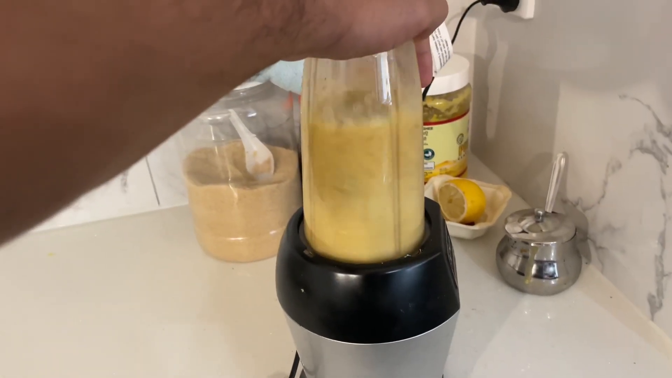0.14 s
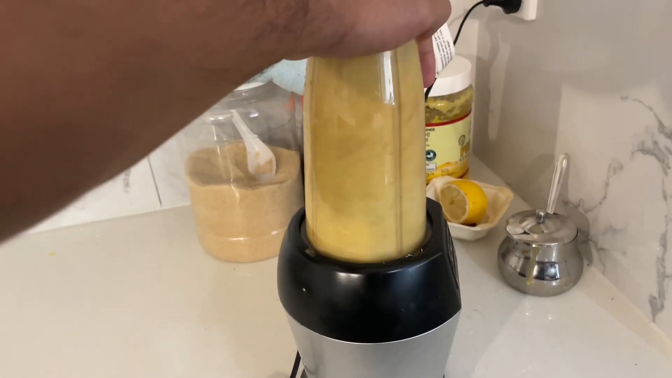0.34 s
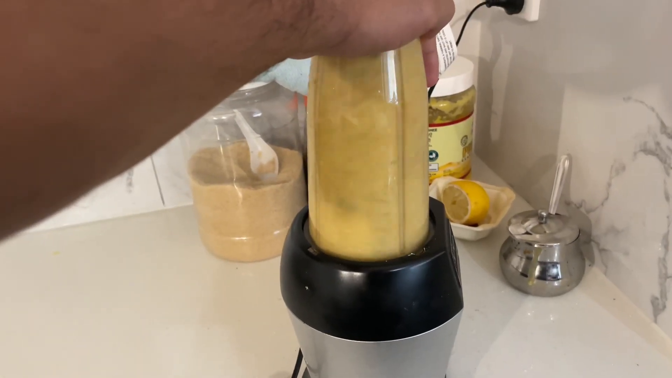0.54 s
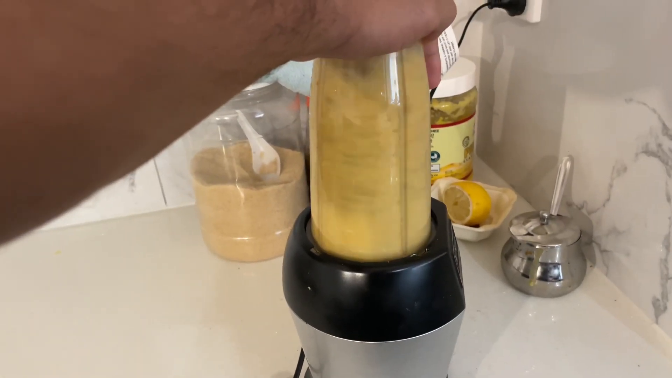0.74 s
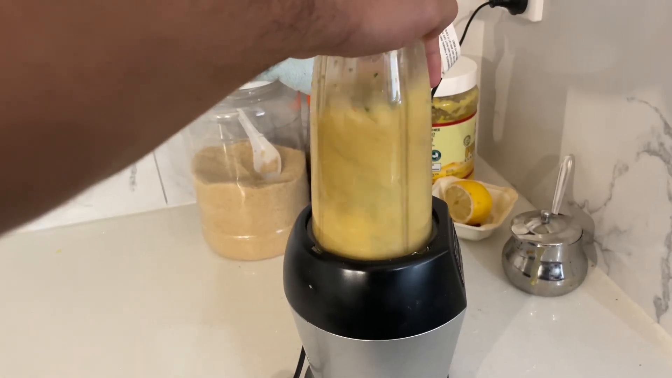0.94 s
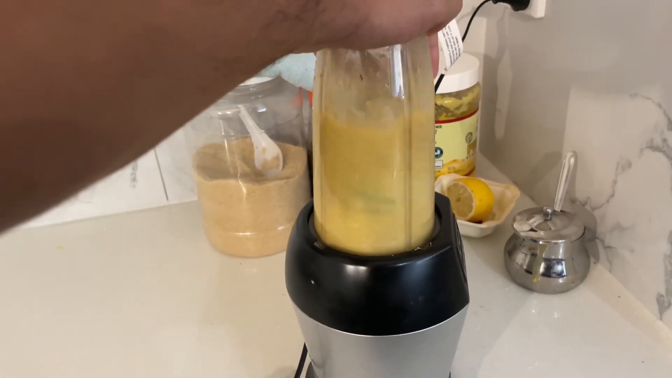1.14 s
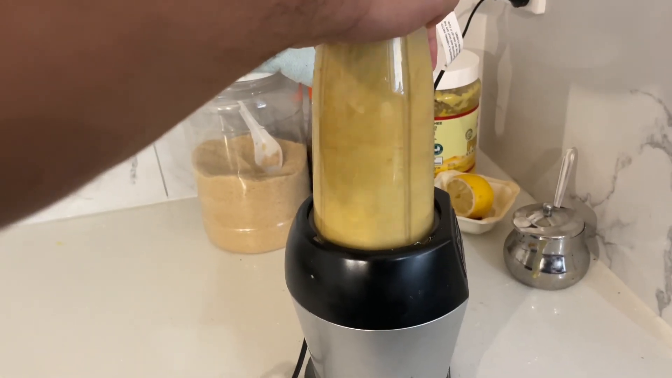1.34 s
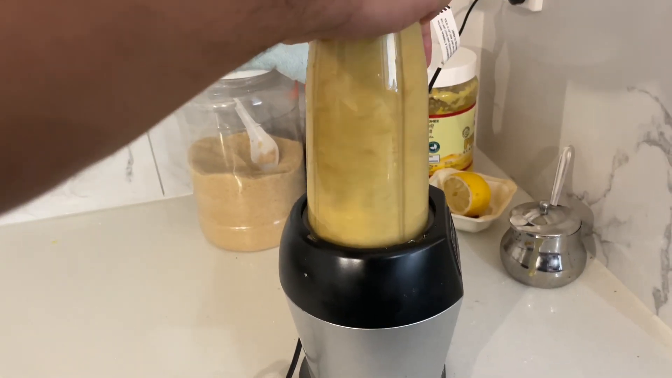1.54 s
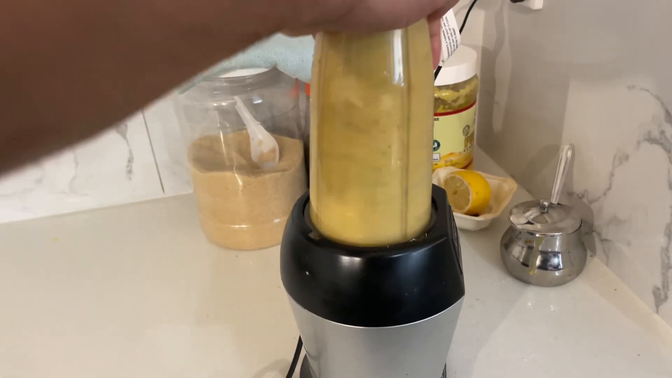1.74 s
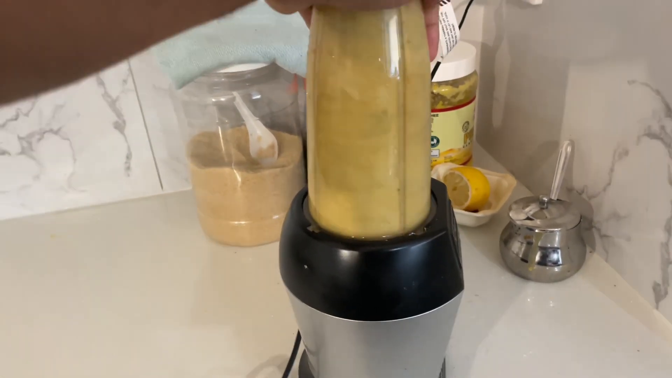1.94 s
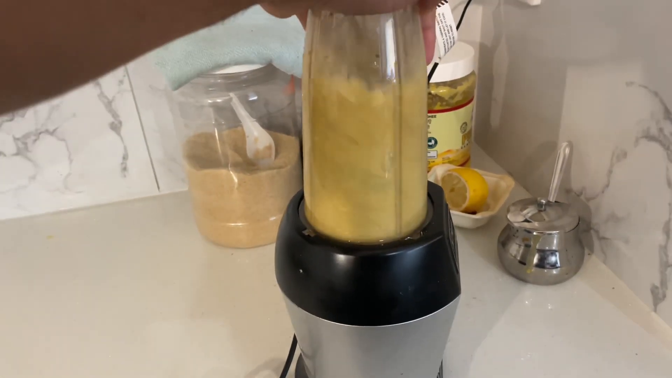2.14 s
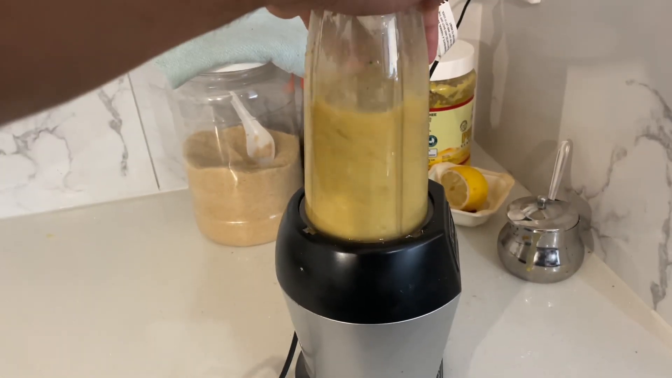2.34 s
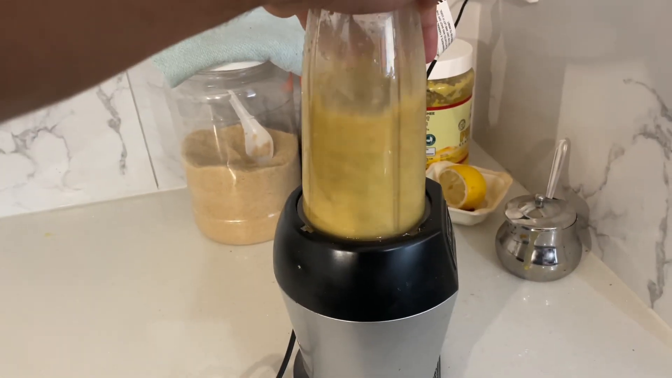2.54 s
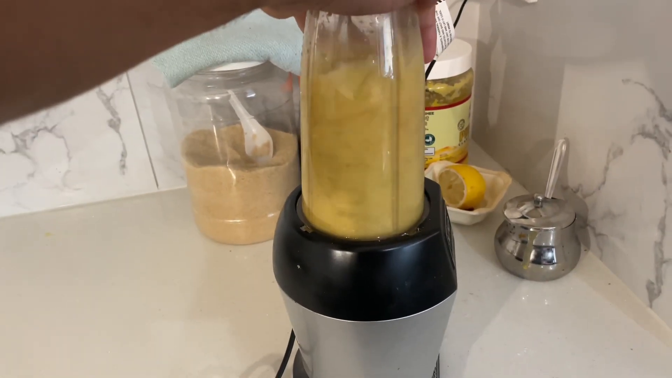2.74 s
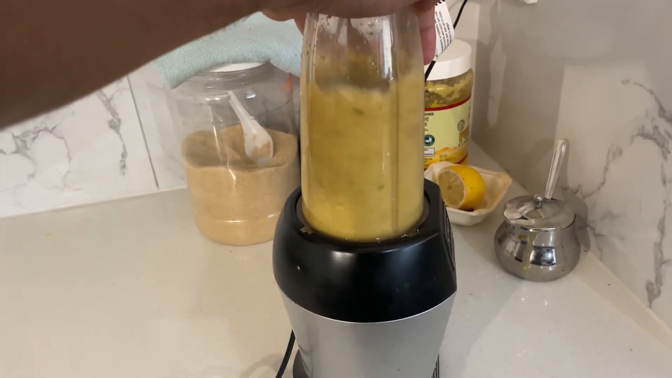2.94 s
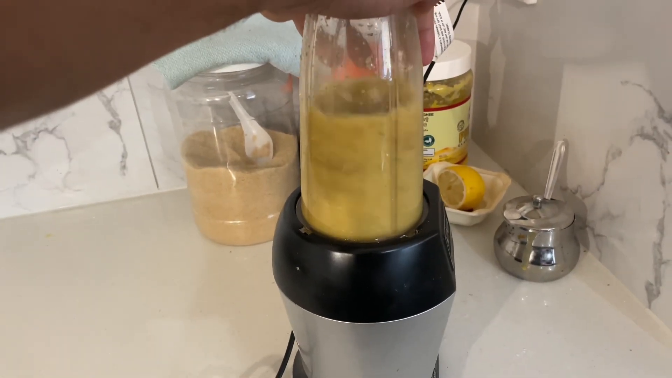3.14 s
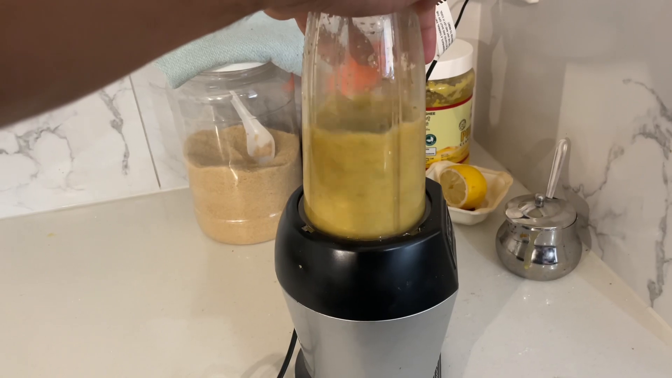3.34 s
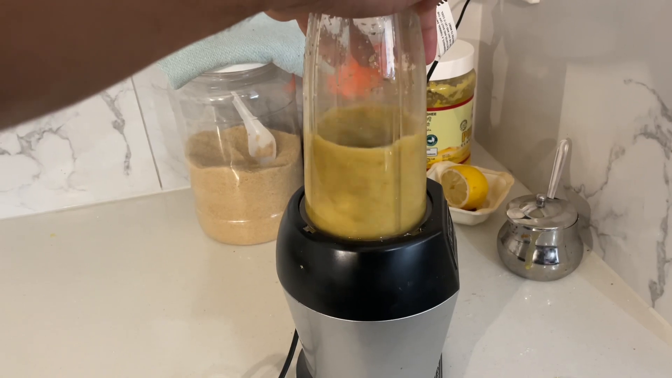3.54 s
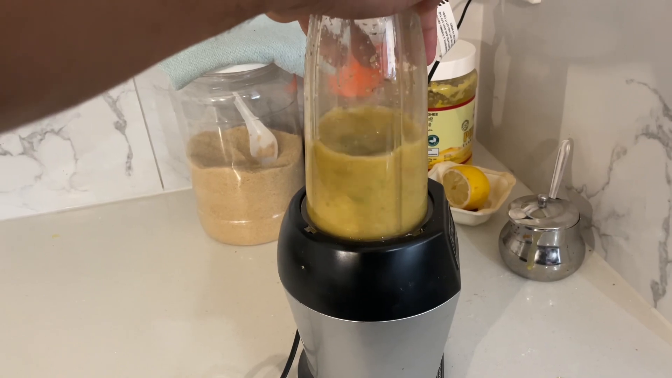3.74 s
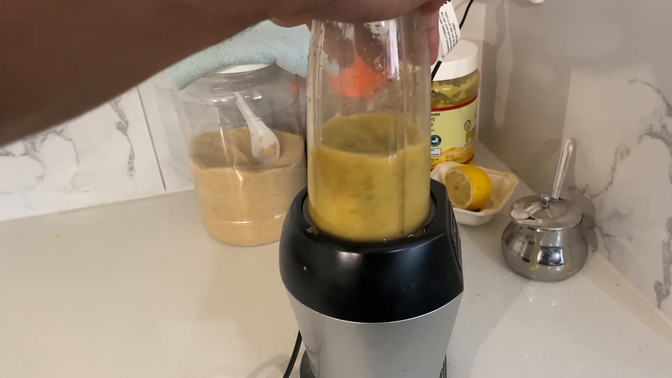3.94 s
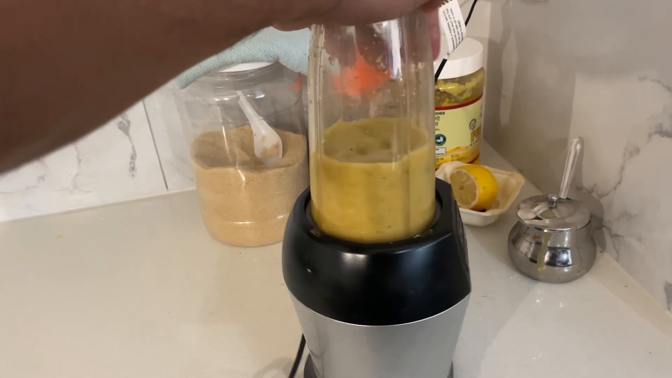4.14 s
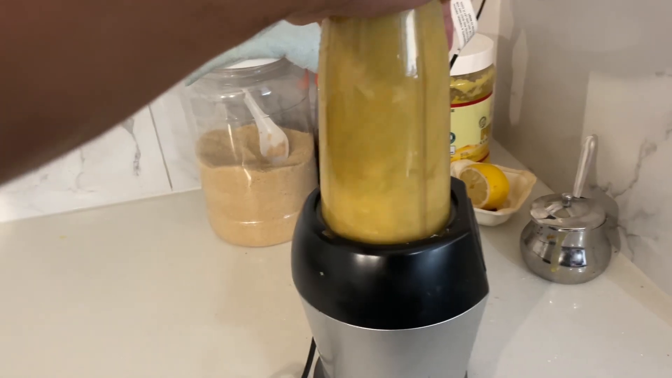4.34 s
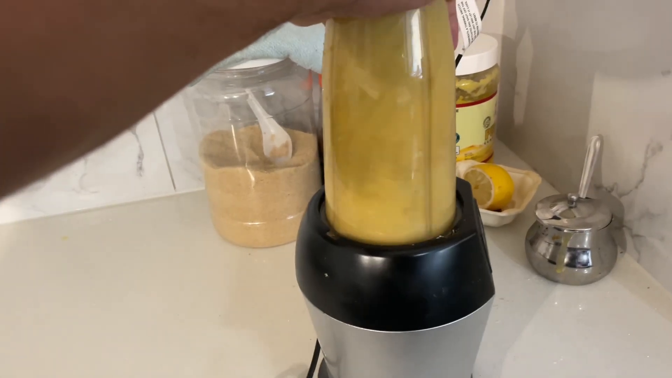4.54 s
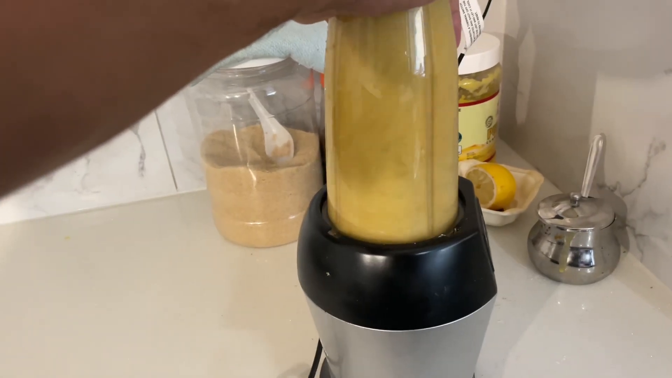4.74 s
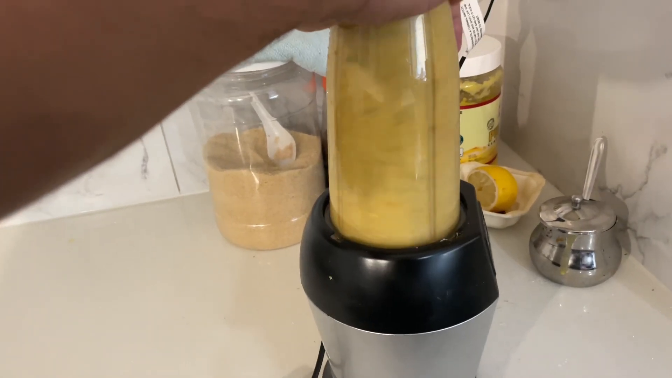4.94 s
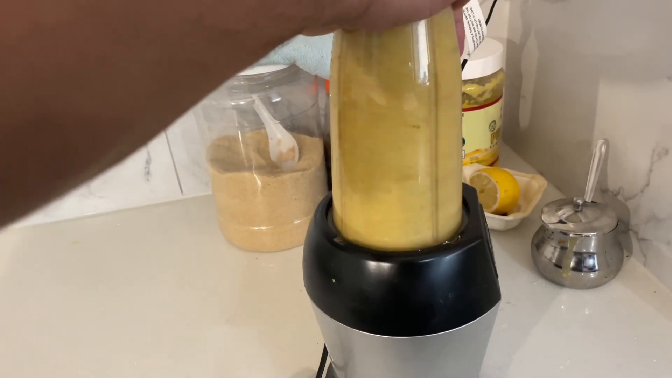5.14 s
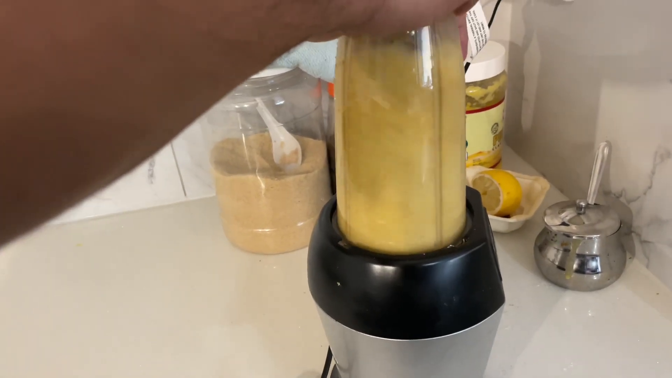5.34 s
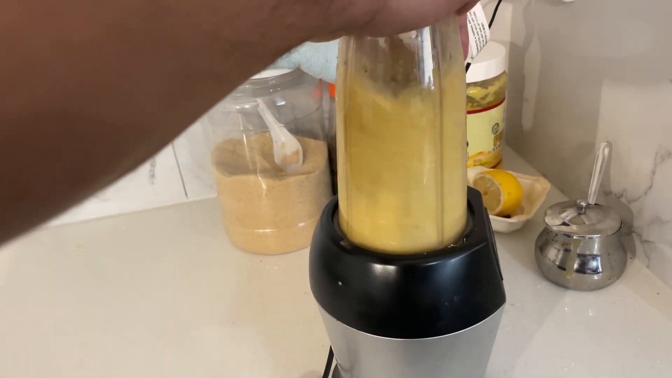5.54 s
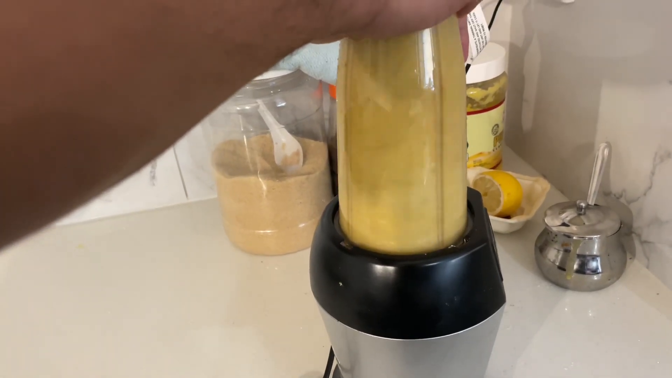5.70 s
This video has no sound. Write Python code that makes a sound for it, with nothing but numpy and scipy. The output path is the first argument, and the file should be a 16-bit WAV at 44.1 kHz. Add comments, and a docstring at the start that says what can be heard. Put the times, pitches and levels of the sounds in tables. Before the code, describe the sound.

A small blender runs on a kitchen counter, very close, in stereo with little room echo. It begins already at speed: a buzzy motor whine around 285 hertz with higher harmonics, over broad, raspy liquid churning and hiss. At about 0.4 s power drops and the pitch sags, softening until 0.8 s, when the motor catches and climbs back to full speed by about 1.3 s. From 1.8 s it winds down in a long falling glide, the churning thinning out. Between 2.3 and 3.2 s loose plastic coupling knocks and ticks rattle irregularly as the shaft slows, with one last faint click near 3.5 s. Then near silence, just low room noise and faint hum. Around 4.1 s a short scrape and a loud, hard switch clack lead into a rapid rising spin-up. From about 4.6 s the full whine and dense, slightly fluctuating churn continue, ending abruptly at nearly 5.9 s.

```python
"""A small blender on a kitchen counter churns a thick drink, close to a phone that hears in stereo.
The motor coasts, picks up at 0.8 s and winds down from 1.8 s with the coupling rattling, then rests.
Near 4.1 s the cup scrapes down, the switch clacks and the motor kicks in and churns to the end.
Shaft orders are sine sums, the churning is filtered noise and ticks, knocks and clack are short rings;
low room noise with a faint hum lies beneath."""
import sys
import numpy as np
from scipy import signal
from scipy.fft import rfft, irfft, next_fast_len
from scipy.io import wavfile
from scipy.ndimage import uniform_filter1d

SR = 44100
rng = np.random.default_rng(int(sys.argv[2]) if len(sys.argv) > 2 else 0)


def inscribe(sig):
    """Save sig as 16-bit PCM at rate SR to the path in sys.argv[1].

    A 1-D sig is mono; a 2-D sig holds one channel per row.
    Samples are clipped to [-1, 1] before scaling.
    """
    pcm = np.round(np.clip(np.atleast_2d(sig).T, -1, 1) * 32767)
    wavfile.write(sys.argv[1], SR, pcm.astype(np.int16))


N = 258867


def gain_of(db):
    """Amplitude factor of a level in dB."""
    return 10 ** (np.asarray(db) / 20)


def evened(x):
    """Scale to rms 1."""
    return x / np.sqrt(np.mean(abs(x) ** 2) + 1e-20)


def read(points, hz):
    """Interpolate a (frequency, value) table along log frequency."""
    f, value = np.transpose(points)
    return np.interp(np.log(hz + 1), np.log(f + 1), value)


def peaks_db(table, hz):
    """Resonance curves in dB, one per (centre, width, height) row."""
    return [db / (1 + (2 * (hz - f) / w) ** 2) for f, w, db in table]


def add(mix, s, sound):
    """Mix a sound in at a time in seconds."""
    part = mix[round(s * SR):][:len(sound)]
    part += sound[:len(part)]


def drift(count, size):
    """Smoothed noise of rms 1; size is the smoothing length in steps."""
    smooth = uniform_filter1d(rng.standard_normal(count), size)
    return evened(uniform_filter1d(smooth, size))


# Shaft, one table a spin: (time [s], speed [turns/s], order 1 rms [dB], order 4 before slack [dB])
SHAFT_SPINS = [
    [(0.0, 290, -22.5, -32), (0.05, 292.2, -25.5, -32), (0.36, 285, -22, -35), (0.42, 251.4, -36, -52),
     (0.68, 185.6, -37.5, -48), (0.812, 160.7, -43, -60), (0.85, 189, -39, -36), (0.9, 217, -35, -42),
     (0.95, 239, -36, -57), (1.04, 264.4, -31, -36), (1.23, 277.3, -27.5, -41), (1.27, 282.2, -24, -57),
     (1.3, 285.5, -25.5, -29), (1.39, 285.5, -23, -29), (1.43, 281.6, -24, -42), (1.54, 291.8, -25, -25.5),
     (1.62, 291.4, -24.5, -34), (1.76, 284.2, -22.5, -27), (1.85, 250.7, -34, -38), (1.96, 223.7, -34, -55),
     (2.02, 208.2, -37, -37.5), (2.27, 153, -43.5, -64), (2.44, 124.4, -45, -66), (2.54, 108, -57, -66),
     (2.64, 92, -60, -64), (2.69, 85, -47, -60), (2.93, 60.1, -50, -64), (3.08, 47, -58, -63),
     (3.22, 36, -68, -70)],
    [(4.2, 148.7, -45, -57), (4.228, 171.1, -35, -42), (4.27, 203, -42, -39), (4.29, 217, -36, -42),
     (4.34, 241, -28.5, -48), (4.4, 244.9, -31, -43), (4.492, 266.4, -34, -44), (4.552, 272.2, -22, -33),
     (4.594, 270.2, -34, -39), (4.72, 285.5, -20, -26.5), (4.766, 292.1, -20.5, -27.5),
     (4.854, 282, -22.5, -29), (4.948, 293.5, -23.5, -35), (5.022, 288.5, -29, -25),
     (5.068, 287.7, -23.5, -31), (5.138, 291.1, -21, -22), (5.2, 292.8, -38, -27),
     (5.324, 288.7, -22.5, -36), (5.442, 293.4, -33, -28), (5.572, 285, -25.5, -47),
     (5.608, 290.1, -23.5, -29), (5.692, 296, -32.5, -45), (5.79, 286.6, -26.5, -34),
     (5.856, 289.3, -23, -31), (5.87, 290, -28, -43)],
]
# Orders 2 and 3 at working speed: (multiple of shaft speed, level [dB])
MIDDLE_ORDERS = [(2, -36.5), (3, -33.5)]
# Weak orders: (multiple of shaft speed, level against half the summed orders 2-4 [dB])
WEAK_ORDERS = [(4 / 3, -8), (5, -9), (6, -13), (7, -11.5), (8, -13), (12, -10), (13, -14)]
WAVER_DB, WAVER_S = 2.0, 0.068  # orders 2 and 3 come and go
WORKING_HZ = 283.3  # shaft turns per second
SLACK_DB, SLACK_SPAN_HZ, SLACK_DB_PER_HZ = -8, 25, -0.0695  # upper orders below working speed
CRAWL_HZ, CRAWL_DB_PER_HZ = 150, -.35  # below this speed all but order 1 fade further
CUP_HZ, CUP_WIDTH_HZ, CUP_LEND_DB = 349, 26, 11  # cup's note, lifting an order that sweeps through


def shaft():
    """The spinning shaft: turns made so far, and sines at multiples of its speed."""
    turns, whine = np.zeros((2, N))
    for rows in SHAFT_SPINS:
        s, *columns = np.transpose(rows)
        t = np.arange(s[0], s[-1], 1 / SR)
        hz, first_db, blade_db = (np.interp(t, s, c) for c in columns)
        # the speed wanders slightly at random
        wander = 0.00519 * drift(len(t), size=400) + 0.00399 * drift(len(t), size=1800)
        spun = np.cumsum(hz * (1 + wander)) / SR

        short_hz = np.maximum(WORKING_HZ - hz, 0)
        slack_db = SLACK_DB * np.minimum(short_hz / SLACK_SPAN_HZ, 1) + SLACK_DB_PER_HZ * short_hz
        crawl_db = CRAWL_DB_PER_HZ * np.maximum(CRAWL_HZ - hz, 0)

        orders = []
        for k, db in MIDDLE_ORDERS:
            cup_db = peaks_db([(CUP_HZ, CUP_WIDTH_HZ, CUP_LEND_DB)], k * hz)[0]
            waver_db = WAVER_DB * drift(len(t), size=round(WAVER_S * SR))
            orders.append((k, gain_of(db + slack_db + crawl_db + cup_db + waver_db)))
        blade_waver_db = 2.5 * drift(len(t), size=350)
        orders.append((4, gain_of(blade_db + 0.09 * slack_db + crawl_db + blade_waver_db)))
        upper = sum(size for k, size in orders) / 2
        orders.append((1, gain_of(first_db)))
        for k, db in WEAK_ORDERS:
            orders.append((k, upper * gain_of(db + 3.1 * drift(len(t), size=500))))

        tone = sum(size * np.sin(2 * np.pi * (k * spun + rng.random())) for k, size in orders)
        # 50 ms fades where each spin starts and stops, but none at the very start and end of the sound
        since_start = t - s[0] + (s[0] < .01)
        until_end = s[-1] - t + (s[-1] > 5.8)
        ends = np.minimum(1, np.minimum(since_start, until_end) / .05)
        add(turns, s[0], spun)
        add(whine, s[0], np.sqrt(2) * tone * ends)
    return turns, whine


# Motor current: (on [s], off [s])
POWER = [(-1, .36), (.8, 1.77), (4.131, 7)]
BRUSH_DB, BRUSH_S = 3, 0.13  # extra hiss under current, and its ramp


def powered(t):
    """1 while current flows, 0 while the motor coasts, with ramps just outside each spell."""
    return sum(np.clip(np.minimum(t - on, off - t) / BRUSH_S + 1, 0, 1) for on, off in POWER)


# Churning through base and cup: (frequency [Hz], spectrum level [dB per Hz])
COLOUR = [(30, -36), (60, -18), (80, -3.5), (140, -6.5), (240, -7.5), (500, -3.5), (650, -5), (1450, -3.5),
          (2700, -5.5), (4300, -7.5), (5700, -12), (7000, -12), (8000, -9), (9500, -12), (10400, -12),
          (12800, -12), (14000, -17), (15500, -33)]
# Housing resonances: (centre [Hz], width [Hz], height [dB])
HOUSING = [(87.4, 14.4, 8), (143, 17, 2.5), (191, 15, 2.5), (233, 24, -3), (351.4, 139, 9), (385, 31, 3.5),
           (766, 304, 6.5), (1150, 240, 5.5), (2073, 580, 5), (2316, 164, 4), (2960, 510, 4.5),
           (3470, 376, 6), (3816, 67, 5), (5490, 200, -3.5), (6530, 1160, 3)]


def body_db(hz):
    """Churning colour plus the resonant peaks of the housing."""
    return read(COLOUR, hz) + sum(peaks_db(HOUSING, hz))


# Churning, one table a spin: (time [s], relative level [dB], counter rumble against it [dB])
CHURN = [
    [(0.0, -27.5, -26.5), (0.02, -26, -14), (0.2, -26, -15), (0.42, -29, -14.5), (0.77, -38, -20.5),
     (0.87, -34, -10), (1.05, -28.5, -12.5), (1.21, -27.5, -17), (1.35, -26.5, -10), (1.41, -26, -18),
     (1.64, -25.5, -10), (1.67, -28, -19), (1.77, -27, -5), (1.84, -28.5, -25), (2.07, -35, -18),
     (2.1, -32.5, -33), (2.14, -36, -18), (2.47, -41.5, -22), (2.51, -40, -20), (2.81, -46.5, -1),
     (2.98, -49, -24), (3.01, -45.5, -5), (3.45, -60.5, -19), (3.5, -60.5, -9)],
    [(4.19, -36.5, -2), (4.248, -33.5, -3), (4.326, -26.5, -19), (4.36, -25, -11), (4.42, -27, -15),
     (4.524, -24.5, -14), (4.55, -23, -10), (4.668, -24, -13), (4.744, -22, -16), (4.872, -24.5, -7),
     (5.008, -23, -18), (5.242, -23.5, -13), (5.318, -25.5, -16), (5.36, -24, -10), (5.526, -25, -19),
     (5.614, -27, -10), (5.704, -26.5, -16), (5.738, -24, -10), (5.804, -26.5, -18), (5.87, -26.5, -4)],
]
# Cup boom, one table a spin: (time [s], level [dB])
BOOM = [
    [(0.0, -28), (0.09, -36), (0.16, -28), (0.53, -31.5), (0.54, -53), (0.58, -30.5), (0.88, -41),
     (0.99, -28.5), (1.36, -31.5), (1.63, -28), (1.77, -37), (1.86, -30), (1.94, -39), (2.31, -39.5),
     (2.34, -44.5), (2.5, -38), (2.52, -41.5), (3.5, -56)],
    [(4.16, -38.5), (4.188, -46), (4.244, -32.5), (4.32, -25), (4.42, -32.5), (4.616, -26.5), (4.63, -29),
     (4.764, -30), (5.002, -32.5), (5.202, -31), (5.24, -35), (5.322, -29), (5.378, -33), (5.398, -29.5),
     (5.646, -33.5), (5.674, -30), (5.812, -33), (5.87, -29)],
]
# Peaks and dips of the calmer churning: (centre [Hz], width [Hz], change per 20 dB of calming [dB])
COASTING = [(405, 81, -4), (478, 80, -2), (596, 73, -13), (2120, 40, -0.5), (1390, 84, -8.5), (1550, 60, 8),
            (1680, 104, -11), (1843, 105, 10), (2250, 56, 2.5), (2540, 180, -6), (3500, 300, 1.5),
            (3830, 81, 5), (159.86, 64.7, 0), (930, 140, 2.5), (5200, 1350, 3.5), (6740, 1400, 1.5),
            (11600, 2400, 1)]
STILL_S, STILL_DB, STILL_RUMBLE_DB = 3.65, -78, -14  # the drink has settled
JOLT_S, JOLT_DB, JOLT_RUMBLE_DB = 4.15, -30.5, 0  # the motor kicks against the resting drink
JOLT_SPAN_S, JOLT_DULL_DB, JOLT_BODY_DB = 0.06, -20, 4.5  # little hiss, and a shaken base
RUMBLE_IN_COLOUR_DB, BOOM_IN_COLOUR_DB = -15, -8  # shares already held by the colour and housing
PUFF = 0.18  # depth of the once-a-turn throb at working speed
FAN_HZ, FAN_TICKS = 4800, 0.44  # crossover to smooth fan hiss, and its share of ticks
CUP_STANDOUT_DB = 4  # cup's note over calm churning
PATCHY_DB, HISS_WAVER_DB = 1.2, 0.9


def churn(turns):
    """The blade beats the drink: rasp throbbing once a turn, with ticks, through base and cup.
    Three independent strands: one common to both channels, and one for each channel alone."""
    still = [(s, STILL_DB, STILL_RUMBLE_DB) for s in (STILL_S, JOLT_S - JOLT_SPAN_S)]
    jolt = [(JOLT_S, JOLT_DB, JOLT_RUMBLE_DB)]
    s, level_db, rumble_db = np.transpose(CHURN[0] + still + jolt + CHURN[1])
    seconds = np.arange(N) / SR
    calm = np.clip((-32.5 - np.interp(seconds, s, level_db)) / 12, 0, 1)
    at_speed = np.clip((np.gradient(turns) * SR - WORKING_HZ) / SLACK_SPAN_HZ + 1, 0, 1)

    # source: about 300 ticks a second over noise
    struck = rng.random((3, N)) < 300 / SR
    ticks = 3.7 * np.minimum(rng.exponential(1, (3, N)), 2.5) * struck
    ticks -= ticks.mean()
    puffs = 1 + PUFF * at_speed * np.cos(2 * np.pi * turns)
    # unloaded, the coupling chatters in bursts
    burst_db = 1.9 * np.minimum(rng.exponential(1, N // 120 + 1), 3) - 2
    loose = np.repeat(gain_of(burst_db), 120)[:N]
    rattle = 1 + calm * (uniform_filter1d(loose, 80) - 1)
    rush = rng.standard_normal((3, N)) * rattle
    rasp = evened((rush + ticks) * puffs)
    fan = evened(rush + FAN_TICKS * ticks)

    # base and cup, evened by their 1300-4500 Hz power
    size = next_fast_len(N, True)
    fine = np.fft.rfftfreq(size, 1 / SR)
    body = gain_of(body_db(fine))
    middle = (fine > 1300) & (fine < 4500)
    body /= np.sqrt(np.sum(body[middle] ** 2) / len(fine))
    high = 1 - 1 / (1 + (fine / FAN_HZ) ** 6)
    blend = rfft(rasp, size) * (1 - high) + rfft(fan, size) * high
    coloured = irfft(blend * body, size)[:, :N]

    # levels over time and frequency
    hz, t, z = signal.stft(coloured, SR, nperseg=1024, noverlap=768)
    churn_db = np.interp(t, s, level_db)
    rumble = np.interp(t, s, rumble_db) - RUMBLE_IN_COLOUR_DB
    boom_db = np.interp(t, *np.transpose(BOOM[0] + BOOM[1]))
    boom = np.clip(boom_db - churn_db - BOOM_IN_COLOUR_DB, -12, 12)
    hiss = JOLT_DULL_DB * np.clip(1 - abs(t - JOLT_S) / JOLT_SPAN_S, 0, 1)
    hiss += BRUSH_DB * (powered(t) - 1) + HISS_WAVER_DB * drift(len(t), size=8)
    shake = JOLT_BODY_DB * np.clip(1 - abs(t - JOLT_S - JOLT_SPAN_S) / (2 * JOLT_SPAN_S), 0, 1)
    coasting = np.clip((-23.5 - churn_db) / 20, 0, 1)
    field = churn_db + np.outer(1 / (1 + (hz / 150) ** 4), rumble)
    field += np.outer(1 / (1 + ((hz - 370) / 70) ** 2), boom)
    field += np.outer(1 / (1 + (6000 / (hz + 1)) ** 3), hiss)
    field += np.outer(1 / (1 + (hz / 1100) ** 4), shake)
    field += np.outer(sum(peaks_db(COASTING, hz)), coasting)
    patches = uniform_filter1d(rng.standard_normal(field.shape), 10, 0)
    patches = evened(uniform_filter1d(patches, 12, 1))
    surges = drift(len(t), size=3)  # the level wavers slightly in all bands
    z = z * gain_of(field + PATCHY_DB * patches + 0.27 * surges + 1.5)
    out = signal.istft(z, SR, nperseg=1024, noverlap=768)[1][:, :N]

    note = signal.lfilter(*signal.iirpeak(CUP_HZ, CUP_HZ / CUP_WIDTH_HZ, fs=SR), out)
    standout = np.clip(calm + 0.33 * (1 - at_speed), 0, 1)
    # silent from settling until the switch, then a 20 ms rise
    on_s = POWER[-1][0]
    since_on = seconds - on_s
    gate = np.where(since_on < STILL_S - on_s, 1, np.clip(since_on / .02, 0, 1))
    return gate * (out + (gain_of(CUP_STANDOUT_DB) - 1) * standout * note)


# Loose coupling: (time [s], peak [dB], treble before -1 dB [dB], swell time [s], ring [Hz])
KNOCKS = [(2.3301, -35, 0, .002, 1904), (2.3785, -22, -3, 0.0021, 2100), (2.3975, -33, 12, 0.00097, 7000),
          (2.4037, -24, -1, .003, 1950), (2.4493, -33, 3, .0015, 2000), (2.5020, -32, 4, .002, 3500),
          (2.5534, -24, 0, 0.0031, 1900), (2.637, -24.5, 12, .0015, 6000), (2.7242, -31, -4, 0.0031, 3485),
          (2.7465, -35, 12, .001, 7000), (2.7705, -25, -9, 0.0032, 2000), (2.8445, -24, -2, 0.0017, 3400),
          (2.8489, -23, 4, .002, 3000), (2.8863, -26.5, -12, .0015, 3500), (2.9116, -25, -1, 0.001, 1900),
          (2.9382, -29, -8, .0015, 3600), (2.9826, -25, -8, 0.0012, 2980), (2.9858, -22.5, 15, .001, 5500),
          (2.994, -36, -4, .001, 3900), (3.0055, -24, 10, .0012, 2000), (3.0415, -30, -2, .001, 3300),
          (3.0538, -29, 13, .001, 7000), (3.0613, -25, -4, .0018, 1100), (3.0884, -29, -5, .002, 1900),
          (3.152, -37, 5, .001, 3500), (3.1687, -28, 7, .0015, 6000), (3.2324, -34.5, -2, .002, 3000),
          (3.4645, -39.5, -2, .003, 3000), (4.0362, -35.5, 11, 0.0021, 2960),
          (4.1608, -17.5, 4, 0.00099, 3000), (4.1725, -23, -6, .001, 3600)]
# Cup scraping down onto the switch: (time [s], peak [dB], treble before -1 dB [dB], swell time [s], ring [Hz])
PRESS = [(4.118, -36, 0, .004, 6500), (4.124, -31, 10, .004, 2000)]
KNOCK_RING, KNOCK_Q = 0.62, 3.9  # ring of the struck part of the housing


def knocks():
    """Coupling knocks and cup scrapes: short flurries of ticks, coloured and rung by the housing."""
    out, t = np.zeros(N), np.arange(2048) / SR
    hz = np.fft.rfftfreq(2048, 1 / SR)
    for s, db, treble_db, swell_s, ring_hz in KNOCKS + PRESS:
        ticks = rng.standard_normal(2048) * gain_of(3.3 * rng.standard_normal(2048))
        ticks *= t * np.exp(-t / np.clip(swell_s, .0003, .008))
        shape = body_db(hz) + (treble_db - 1.0) / (1 + (4200 / (hz + 1)) ** 4)
        shape -= 22 / (1 + (hz / 1300) ** 3) + 20 / (1 + (hz / 500) ** 4)
        ring = signal.lfilter(*signal.iirpeak(ring_hz, KNOCK_Q, fs=SR), ticks)
        knock = evened(irfft(rfft(ticks) * gain_of(shape))) + KNOCK_RING * evened(ring)
        add(out, s, gain_of(db) * knock / abs(knock).max())
    return out


# Plastic base: (frequency [Hz], level [dB], t60 [s])
CLACK_MODES = [(495, -3.5, 0.11), (680, -4, 0.07), (900, -5, 0.067), (1154, 2, 0.056), (1373, 1.5, 0.066),
               (1824, -4, .06), (1943, -4, .06), (2385, -7, .04), (2840, 1, 0.034), (3140, 5.5, 0.022),
               (3700, -4, 0.048), (4310, -10, .03), (6500, -26, 0.028)]
CLACK_S, CLACK_RING_PEAK_DB, CRACK_T60_S = 4.1311, -13, 0.034
CLACK_RISE_TURNS = 1.6  # cycles a mode needs to build up


def clack():
    """The switch snaps: a crack of noise and the short modal ring of the plastic base."""
    t, out = np.arange(6000) / SR, np.zeros(N)
    ring = np.zeros(len(t))
    for hz, db, t60_s in CLACK_MODES:
        rise = np.minimum(1, (hz * t / CLACK_RISE_TURNS) ** 2)
        ring += gain_of(db - 60 * t / t60_s) * rise * np.sin(2 * np.pi * hz * t)
    band = signal.butter(2, [500, 4500], "band", fs=SR)
    dull = signal.lfilter(*band, rng.standard_normal(6000))
    crack = (dull + 0.11 * rng.standard_normal(6000)) * gain_of(-60 * t / CRACK_T60_S)
    add(out, CLACK_S, gain_of(CLACK_RING_PEAK_DB) * (ring / abs(ring).max() + crack))
    return out


# Kitchen at rest, last two rows replaced by QUIET_TOP: (frequency [Hz], relative level [dB per Hz])
QUIET = [(18, -55), (30, -32), (45, -22), (66, -20), (110, -25), (251, -21), (295, -11), (514, -12.5),
         (591, -20), (727, -16.5), (916, -8), (1300, -13), (7500, -25.5), (9750, -60), (16500, -120)]
QUIET_TOP = [(9000, -31), (12000, -28.5), (15000, -41)]  # same columns
# Faint room tones: (frequency [Hz], level before +6 dB and swell [dB])
HUM = [(953, -64.5), (899, -70), (516, -74), (64.05, -79)]
# Hum swell: (time [s], level [dB])
HUM_SWELL = [(0, -4), (3.7, -2.5), (3.88, 1), (4.1, 0), (5.87, -2)]
QUIET_RMS_DB = -54.5


def kitchen():
    """Steady coloured room noise in the same three strands, with a faint wavering hum in the first."""
    size = next_fast_len(N, True)
    hz, t = np.fft.rfftfreq(size, 1 / SR), np.arange(N) / SR
    colour = gain_of(read(QUIET[:-2] + QUIET_TOP, hz))
    noise = irfft(rfft(rng.standard_normal((3, size))) * colour, size)[:, :N]
    noise = gain_of(QUIET_RMS_DB) * evened(noise)
    waver = np.cumsum(1 + 0.0063 * drift(N, size=1500)) / SR
    hum = sum(gain_of(db + 6) * np.sin(2 * np.pi * (f * waver + rng.random())) for f, db in HUM)
    noise[0] += hum * gain_of(np.interp(t, *np.transpose(HUM_SWELL)))
    return noise


# Share common to both channels: (frequency [Hz], power share [0-1])
COMMON_SHARE = [(150, .97), (340, .96), (690, .75), (1030, .4), (1550, .55), (2200, .6), (3300, .69),
                (4600, .6), (5200, .36), (6700, .58), (7250, .46), (7750, .73), (8300, .9), (8800, 1),
                (9300, .9), (10000, .64), (12100, .67), (12900, .92), (13500, 1)]
# Stereo phase by frequency: (frequency [Hz], left lead [rad]), in phase at the top
STEREO_PHASE = [(100, .1), (340, 0), (700, .5), (1100, .4), (1550, -.5), (2070, .1), (2600, 1),
                (3600, 1.35), (4100, .8), (5250, 1.3), (5600, -1.8), (6700, -1), (7250, -1.7), (7750, -2.7),
                (8300, -np.pi), (8900, -np.pi), (10000, -4), (11400, -4.9), (12900, -2 * np.pi)]
# Stereo phase of the shaft tones: (frequency [Hz], left lead [rad])
WHINE_PHASE = [(300, 0.2), (600, 0.8), (900, 1.3), (1150, 1.06), (1500, 0.69), (3500, 1.45)]
# Channel balance: (frequency [Hz], left minus right [dB])
SIDES = [(60, 1.6), (240, .5), (480, 1), (1000, 6.3), (1550, 2.2), (2600, 2), (3300, 3.3), (4300, 1.3),
         (5200, 2), (6700, -1.2), (7300, 1.5), (8800, 0), (15000, 0)]
ROOM_T60_S = 0.15
MONO_HZ = 120  # below this the steady sound is all common


def scene():
    """Stereo mix: a common part with a phase set by frequency, and an unlike blur in each channel."""
    turns, whine = shaft()
    size = next_fast_len(N + SR, True)
    hz, t = np.fft.rfftfreq(size, 1 / SR), np.arange(SR // 2) / SR
    walls = rng.standard_normal((2, len(t))) * gain_of(-60 * t / ROOM_T60_S) * (t > .003)
    walls = rfft(walls / np.linalg.norm(walls, axis=1, keepdims=True), size)
    share = np.where(hz < MONO_HZ, 1, np.clip(read(COMMON_SHARE, hz), 0, 1))
    side = np.array([[.5], [-.5]])  # left, right
    turned = np.exp(1j * (side - .5) * read(STEREO_PHASE, hz))
    steady = rfft(churn(turns) + kitchen(), size)
    blows = rfft(knocks() + clack(), size)
    common = (np.sqrt(share) * steady[0] + blows) * turned
    common += rfft(whine, size) * np.exp(1j * side * read(WHINE_PHASE, hz))
    blur = np.sqrt(1 - share) * (steady[1:] + gain_of(-7.5) * blows * walls)
    return irfft((common + blur) * gain_of(side * read(SIDES, hz)), size)[:, :N]


CEILING, EDGE_HZ = .9, 15750  # peak limit as a share of full scale, and band edge


def record(dry):
    """The phone's input rounds off peaks (tanh) and a linear-phase low-pass limits the band."""
    soft = CEILING * np.tanh(dry / CEILING)
    lowpass = signal.firwin(511, EDGE_HZ, window=("kaiser", 10), fs=SR)
    return signal.oaconvolve(soft, lowpass[None], "same")


dry = scene()
out = record(dry)
inscribe(out)
```